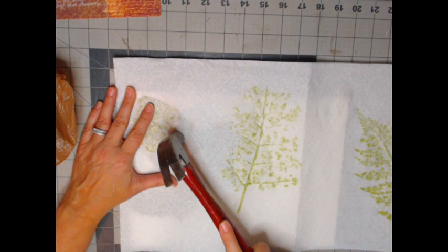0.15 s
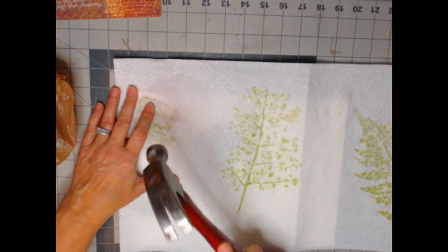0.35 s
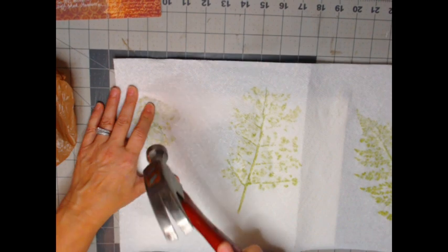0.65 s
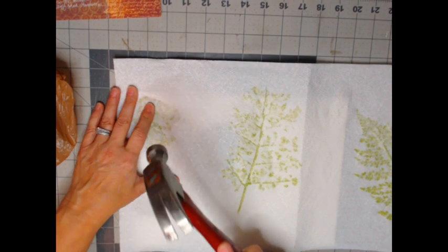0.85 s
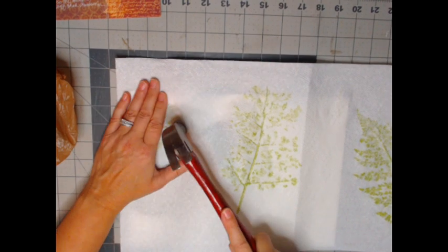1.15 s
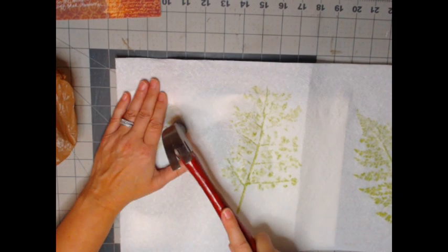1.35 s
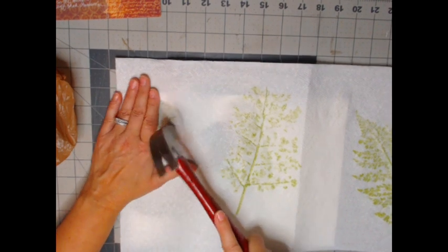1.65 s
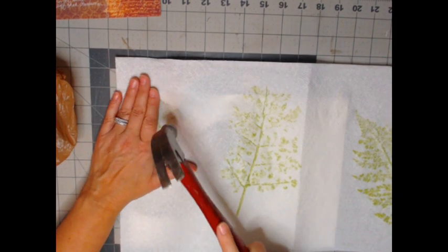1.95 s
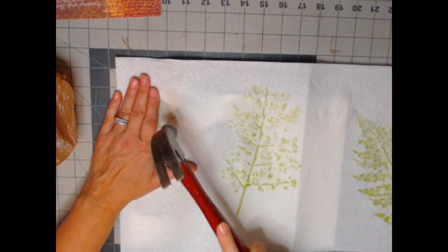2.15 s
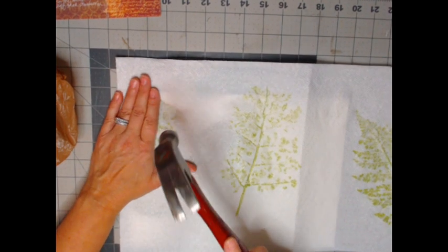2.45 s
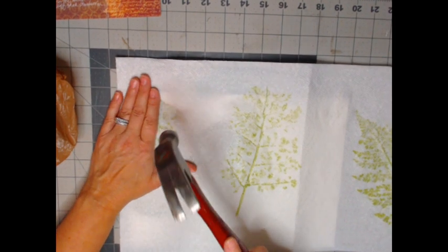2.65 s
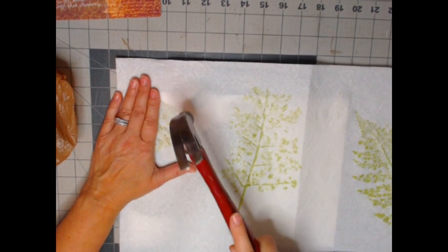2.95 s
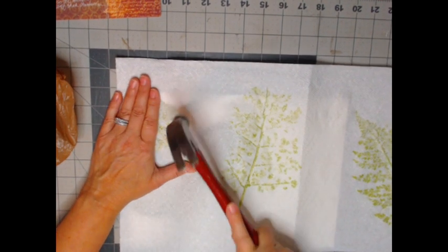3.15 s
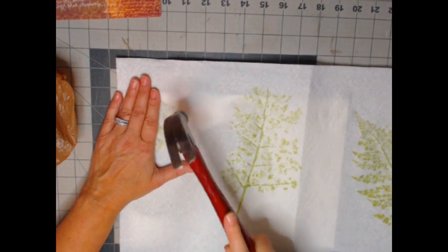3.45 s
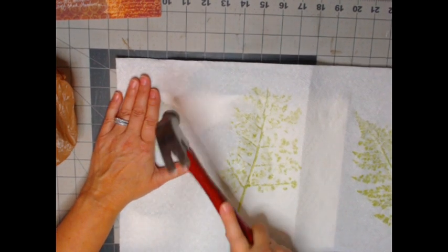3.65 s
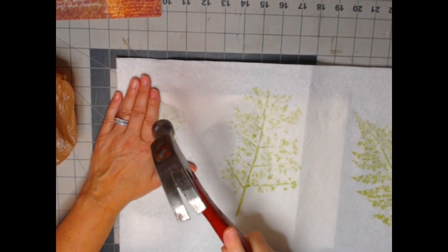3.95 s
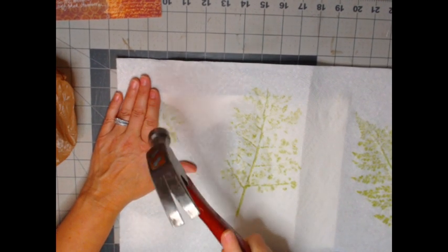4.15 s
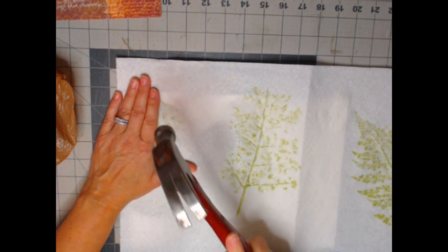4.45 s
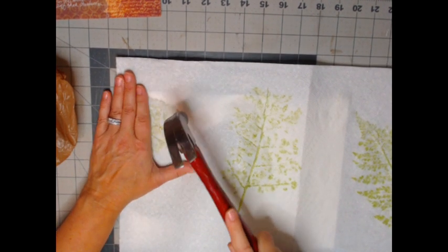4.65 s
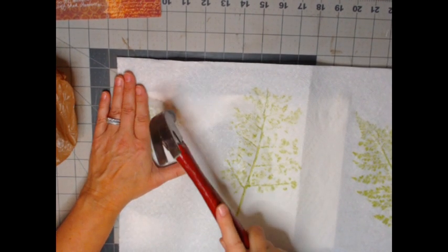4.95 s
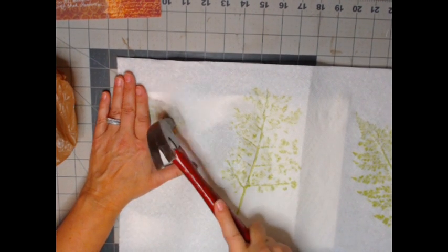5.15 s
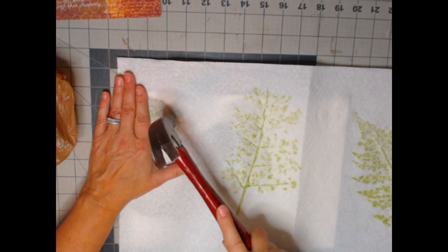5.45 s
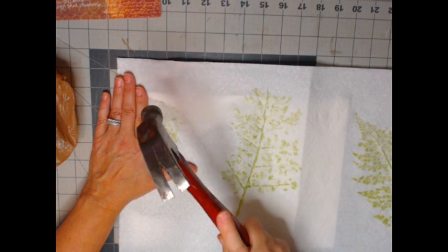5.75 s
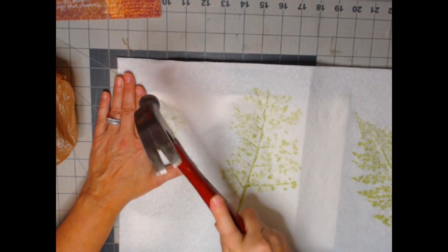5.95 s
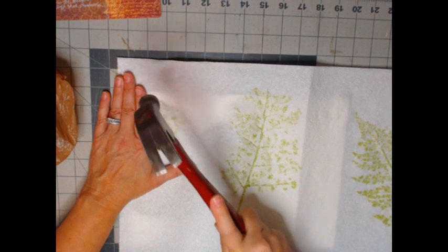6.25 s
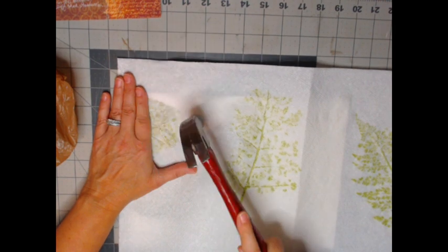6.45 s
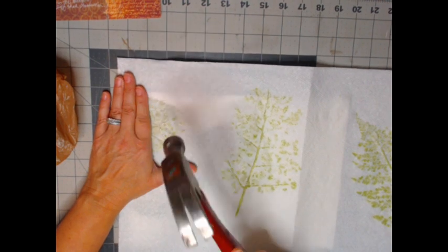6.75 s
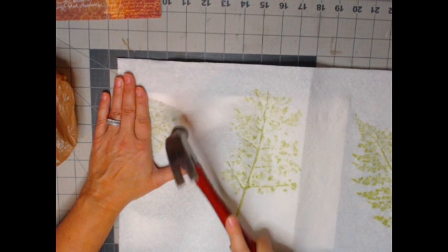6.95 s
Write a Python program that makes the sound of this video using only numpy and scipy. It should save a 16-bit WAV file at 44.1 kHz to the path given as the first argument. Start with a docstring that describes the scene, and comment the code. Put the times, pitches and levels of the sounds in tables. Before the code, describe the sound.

A hammer raps steadily through paper towels onto a mat-covered hard table, sharp woody knocks over three a second, in a small bare room.

```python
"""A steel hammer taps a leaf between paper towels on a mat over a hard table, in a small bare room.
Each blow is a short force pulse that rings the table top, a few room modes and a diffuse noise tail.
The towels add a bright fizz, a low thump reaches the microphone through the table, and one faint
tick falls in a pause. Mains hum and a faint hiss with rumble lie under it all.
The close microphone has a treble resonance and flattens peaks that exceed its range."""
import sys
import numpy as np
from scipy import signal
from scipy.io import wavfile

SR = 44100
rng = np.random.default_rng(int(sys.argv[2]) if len(sys.argv) > 2 else 0)


def to_wav(s):
    """Save 16-bit WAV."""
    ch = np.atleast_2d(s).T  # columns
    pcm = np.round(np.clip(ch, -1, 1) * 32767)  # PCM
    wavfile.write(sys.argv[1], SR, pcm.astype(np.int16))


N = 313110
LEAD, ANSWER_LENGTH = SR // 4, SR   # run-in before time zero, one answer of room or paper [samples]
CONTACT_HZ = 5190   # low-pass corner shared by the blow force and the paper fizz

# Hammer blows; the one before time zero is heard only as a dying tail. Treble tells how hard the contact is.
# (time [s], relative strength [dB], relative treble [dB])
BLOWS = [(-.19, 1, 0.8), (0.11, 1.05, 4.5), (0.402, 1, 3), (0.705, 2.5, 3.5), (1.3918, 2.1, -2),
         (1.6714, 1.35, -2.5), (1.9326, 2.5, 0), (2.2148, 2.45, -0.5), (2.5019, 1.45, 2.5),
         (2.7895, 0.7, 1.5), (3.075, -1.9, 4.5), (3.3627, -1.64, 4.5), (3.6533, -2, 4), (3.952, -3, 5.5),
         (4.2446, -2.5, 4), (4.54, -2.8, 3.5), (4.8383, -3, 0.5), (5.1248, -3, 2.5), (5.4013, -2.4, 2.5),
         (5.6942, -2, 3.5), (5.987, -2, 3), (6.2635, -3, 5.5), (6.5587, -1.7, 3.4), (6.848, -1.4, 4.5)]


def from_db(db):
    """Amplitude ratio: 20 dB make a factor of ten."""
    return 10 ** (np.asarray(db) / 20)


def rms_one(x):
    """Normalisation: division by the root mean square gives unit rms."""
    return x / np.sqrt(np.mean(x ** 2) + 1e-20)


def at_hz(rows, hz):
    """Spectral interpolation: table columns are read at a frequency on a logarithmic axis."""
    log_hz = np.log(np.array(rows)[:, 0])
    return [np.interp(np.log(hz), log_hz, column) for column in np.transpose(rows)[1:]]


def ring(clicks, hz, t60):
    """Damped resonator: a unit click excites a decaying sine of initial height 1."""
    radius, angle = from_db(-60 / (t60 * SR)), 2 * np.pi * hz / SR
    feedback = [1, -2 * radius * np.cos(angle), radius * radius]
    return signal.lfilter([0, np.sin(angle)], feedback, clicks + 1e-18)


def bands(shape):
    """Filter bank: white noise is split into third-octaves, with neighbours uncorrelated."""
    edges = 28 * 2 ** (np.arange(29) / 3)   # Hz
    white = rng.standard_normal((2, *shape))
    for k, (low, high) in enumerate(zip(edges, edges[1:])):
        sos = signal.butter(2, [low, high], "band", fs=SR, output="sos")
        yield np.sqrt(low * high), signal.sosfilt(sos, white[k % 2])


def background():
    """Stationary noise: random hiss and rumble keep a fixed spectrum and level."""
    # Noise spectrum: (frequency [Hz], relative level per hertz [dB])
    hiss_spectrum = [(28, 9), (50, -19), (100, -6), (300, -19.5), (900, -21.5), (4200, -39), (9000, -40.5),
                     (16000, -44.5)]
    noise = sum(from_db(at_hz(hiss_spectrum, hz)[0]) * band for hz, band in bands((N,)))
    return from_db(-64.5) * rms_one(noise)   # rms level in dB


def hum():
    """Amplitude modulation: a slow random waver, in decibels, scales a mains-frequency sine."""
    hum_hz, rms_db, waver_db = 60.3, -52.5, 1.2
    t = np.arange(N) / SR
    waver = np.interp(t, np.linspace(0, t[-1], 60), rng.standard_normal(60))
    amplitude = np.sqrt(2) * from_db(rms_db + waver_db * waver)
    return amplitude * np.sin(2 * np.pi * (hum_hz * t + rng.random()))


def tick():
    """Impulse response: one click excites a strongly damped resonance, heard as a dry tick."""
    # Faint tick in the pause: (time [s], level [dB], frequency [Hz], t60 [s])
    tick_event = (1.1644, -48, 2000, .003)
    s, db, hz, t60 = tick_event
    click = np.arange(N) == round(s * SR)
    return ring(from_db(db) * click, hz, t60)


def paper():
    """Enveloped noise: as the towels spring back, a bright fizz swells and dies after each blow."""
    level_db, spread_db = -40, 2.5
    rise_s, t60_s = .009, .17
    s, strength_db, _ = np.transpose(BLOWS)
    since = np.arange(ANSWER_LENGTH) / SR
    swell = (1 - np.exp(-since / rise_s)) ** 2 * from_db(-60 * since / t60_s)
    starts = np.zeros(N + LEAD)
    spread = rng.normal(0, spread_db, len(s))
    starts[np.round(s * SR).astype(int) + LEAD] = from_db(level_db + strength_db + spread)
    fizz = signal.lfilter(*signal.butter(2, 3800, "high", fs=SR), rng.standard_normal(N + LEAD))
    fizz = signal.lfilter(*signal.butter(1, CONTACT_HZ, fs=SR), fizz)
    return signal.fftconvolve(starts, swell)[:N + LEAD] * fizz


def forces(weights):
    """Contact force: one short weighted push per blow; a harder contact carries more treble."""
    s, strength_db, treble_db = np.transpose(BLOWS)
    at = np.round(s * SR).astype(int) + LEAD
    push, extra = np.zeros((2, N + LEAD))
    push[at] = weights * from_db(strength_db)
    extra[at] = push[at] * (from_db(treble_db) - 1)
    push += signal.lfilter(*signal.butter(1, 1520, "high", fs=SR), extra)   # treble shelf, corner in Hz
    return -signal.lfilter(*signal.butter(2, CONTACT_HZ, fs=SR), push)


def struck(modes, gain_db, spread_db=4.5):
    """Modal superposition: each blow excites every mode at a slightly different level."""
    spread = rng.normal(0, spread_db, (len(BLOWS), len(modes)))
    total = 0
    for k, (hz, db, t60) in enumerate(modes):
        sign = (-1) ** k   # neighbouring modes start in opposite directions
        total = total + sign * ring(forces(from_db(db + gain_db + spread[:, k])), hz, t60)
    return total


def diffuse_tail(count=5):
    """Reverberation as convolution: each blow excites a fixed noise answer and a share of changing ones."""
    # Tail spectrum: (frequency [Hz], relative level per hertz [dB])
    tail_spectrum = [(40, -19), (100, -27.5), (200, -15.5), (290, -14.5), (400, -4), (800, -5.5),
                     (1300, -2), (1890, -5), (2993, -10.5), (4210, -16), (5800, -29), (8000, -23.5),
                     (11000, -24), (16000, -32)]
    # How the tail dies: (frequency [Hz], t60 [s], early scatter relative to the tail [dB])
    tail_decay = [(100, 0.12, 0), (222, 0.36, -2), (500, 0.32, -2), (1210, .35, 3), (2980, 0.25, 8),
                  (6030, 0.19, 8.5), (14000, 0.22, 10.5)]
    tail_db = 3.5
    clatter_t60_s = 0.074   # dense early scatter from the table and the things on it
    slow_db, slow_times = -16.5, 2.08   # a fainter part rings this many times longer
    build_s, build_octave_s = 0.00067, 0.00083   # build-up up to 1 kHz, extra per octave above
    new_share = 0.72   # amplitude share that changes as the hammer moves about
    t, answers = np.arange(ANSWER_LENGTH) / SR, 0
    for hz, noise in bands((count, ANSWER_LENGTH + LEAD)):
        t60, clatter_db = at_hz(tail_decay, hz)
        build = build_s + build_octave_s * max(np.log2(hz / 1000), 0)
        clatter = from_db(clatter_db - 60 * t / clatter_t60_s)
        slow = from_db(slow_db - 60 * t / (slow_times * t60))
        dying = np.hypot(from_db(-60 * t / t60), slow)
        envelope = np.hypot(dying, clatter) * (1 - np.exp(-t / build))
        gain = from_db(at_hz(tail_spectrum, hz)[0] + tail_db)
        answers = answers + gain * envelope * noise[:, LEAD:]
    mix = rng.standard_normal((len(BLOWS), count))
    mix[:, 0] = 0
    mix *= new_share / np.linalg.norm(mix, axis=1, keepdims=True)
    mix[:, 0] = np.sqrt(1 - new_share ** 2)   # the fixed answer keeps the rest of the power
    return sum(signal.fftconvolve(forces(mix[:, k]), answers[k])[:N + LEAD] for k in range(count))


def room_modes(hardness_db):
    """Modal resonance: room and furniture ring out of the tail, and soft contacts excite them more."""
    # Standing resonances: (frequency [Hz], relative level [dB], t60 [s])
    resonances = [(152, -15.5, 0.28), (279, -14, 0.26), (396, -1.5, 0.18), (485, -13, 0.15),
                  (558, -10.5, 0.1), (623.7, -6.5, 0.28), (874, 2, 0.16), (901, -4, 0.12), (1103, -7, 0.32),
                  (1580, -10.5, 0.049), (2370, -7.5, 0.011)]
    return struck(resonances, -16.5 - 0.6 * hardness_db, spread_db=1.64)   # dB per dB of treble


def thump(hardness_db):
    """Structure-borne sound: the blow shakes the microphone through the table, more when hard."""
    # Low shaking modes: (frequency [Hz], relative level [dB], t60 [s])
    shaking_modes = [(35, -32.5, 0.15), (86, -21, 0.058)]
    return struck(shaking_modes, hardness_db)   # 1 dB per dB of treble


def knock(hardness_db):
    """Modal radiation and reflection: the table top rings briefly and delayed copies return."""
    # Table top under the hammer: (frequency [Hz], relative level [dB], t60 [s])
    table_modes = [(569.4, -3.5, 0.025), (937, 0, 0.016), (1353.4, 14.5, 0.0067), (1788, 0.5, .02),
                   (1938, 1, 0.027), (2286, 1.5, 0.022), (2520, -3.5, 0.01)]
    # First echoes from walls and ceiling: (delay [s], level relative to the direct knock [dB])
    echo_paths = [(.004, -25.5), (.0065, -17.5), (0.0101, -13), (0.012, -22.5), (0.031, -30.5),
                  (0.043, -28)]
    ringing = struck(table_modes, 0.67 * hardness_db)   # hard contacts knock louder against the room
    # the padded face presses for about a third of a millisecond
    direct = signal.lfilter(*signal.butter(2, 2200, fs=SR), ringing)
    # the table top is too small to send out deep tones
    direct = signal.lfilter(*signal.butter(2, 287, "high", fs=SR), direct)
    out = direct.copy()
    for delay, db in echo_paths:
        lag = round(delay * SR)
        out[lag:] += from_db(db) * direct[:-lag]
    return out


def scene():
    """Linear superposition: blows, room and hum share one slow level; tick and background stay apart."""
    # The level drops, then creeps back: (time [s], level [dB])
    slow_level = [(0, -3), (0.761, -2), (.88, -3.5), (1.352, -10.5), (2.3, -7.5), (3.2, -0.5), (7.1, 0.5)]
    treble_db = np.array(BLOWS)[:, 2]
    hardness_db = treble_db - np.mean(treble_db)
    room = room_modes(hardness_db) + diffuse_tail()
    blows = knock(hardness_db) + room + paper() + thump(hardness_db)
    level = from_db(np.interp(np.arange(N) / SR, *np.transpose(slow_level)))
    return (level * (blows[LEAD:] + hum()) + tick() + background())[None]


def record(dry):
    """Resonance and saturation: the capsule lifts a treble band, overload flattens peaks, treble is cut."""
    # Capsule resonance: (frequency [Hz], width [Hz], gain at the peak [dB])
    capsule_peak = (6560, 300, 13.6)
    full_scale, knee = .95, 72   # overload ceiling, sharpness of its corner
    hz, width_hz, db = capsule_peak
    r = np.exp(-np.pi * width_hz / SR)
    feedback = [1, -2 * r * np.cos(2 * np.pi * hz / SR), r * r]
    peak = signal.lfilter([(1 - r * r) / 2, 0, (r * r - 1) / 2], feedback, dry)
    x = (dry + (from_db(db) - 1) * peak) / full_scale
    flat = full_scale * x / (1 + np.abs(x) ** knee) ** (1 / knee)
    # treble cut: 75 dB down from 16.7 kHz upward
    return signal.sosfilt(signal.cheby2(14, 75, 16700, fs=SR, output="sos"), flat)


dry = scene()
out = record(dry)
to_wav(out)
```